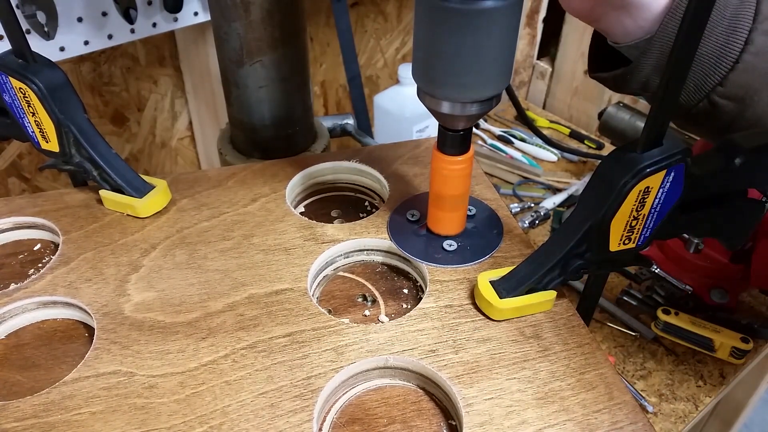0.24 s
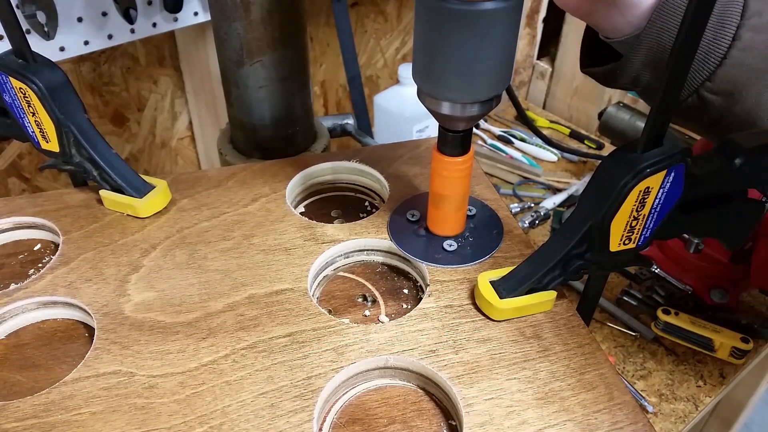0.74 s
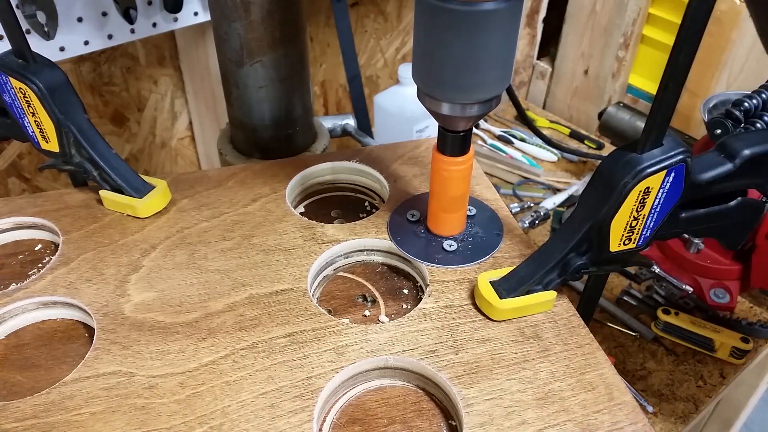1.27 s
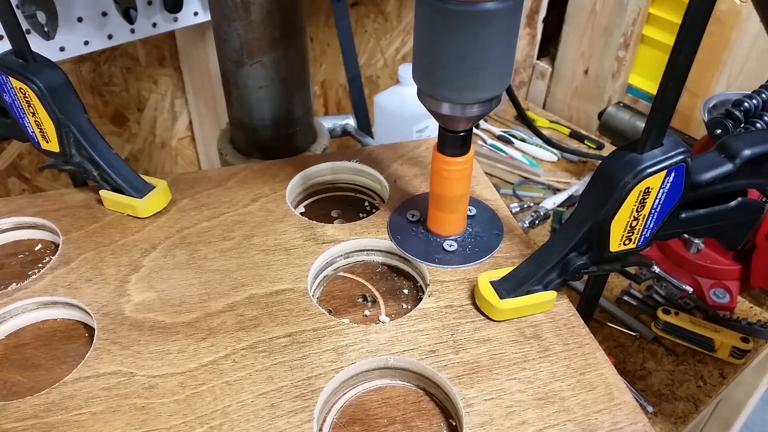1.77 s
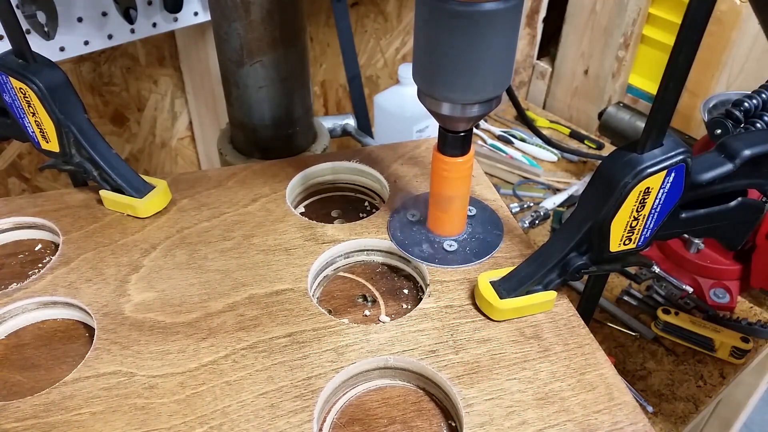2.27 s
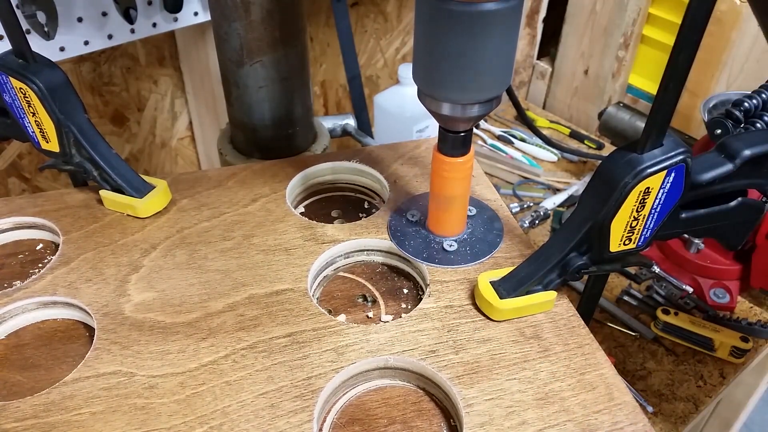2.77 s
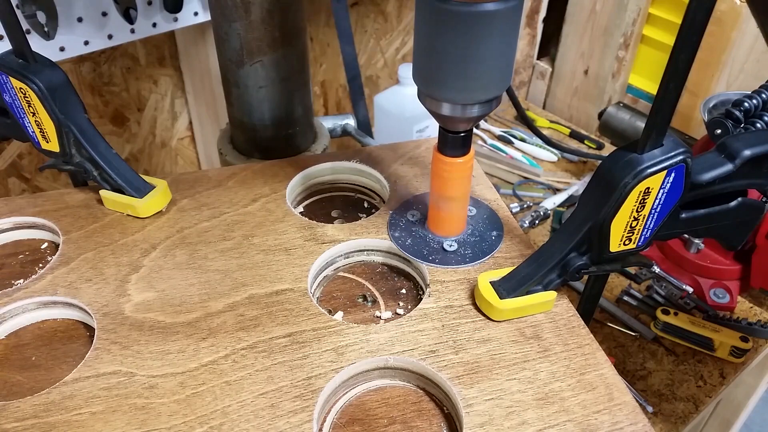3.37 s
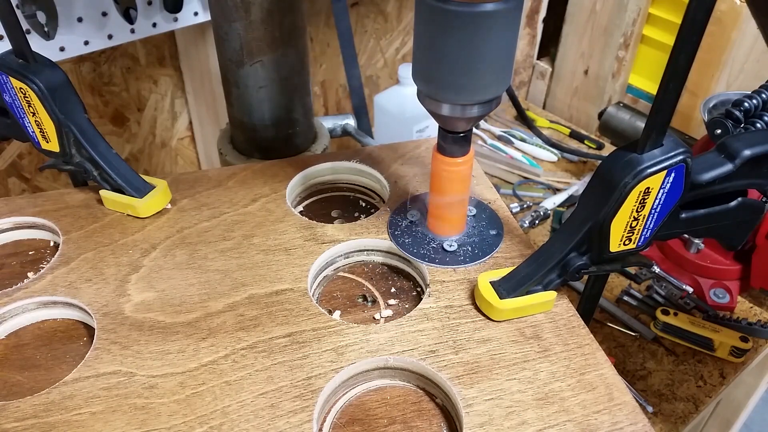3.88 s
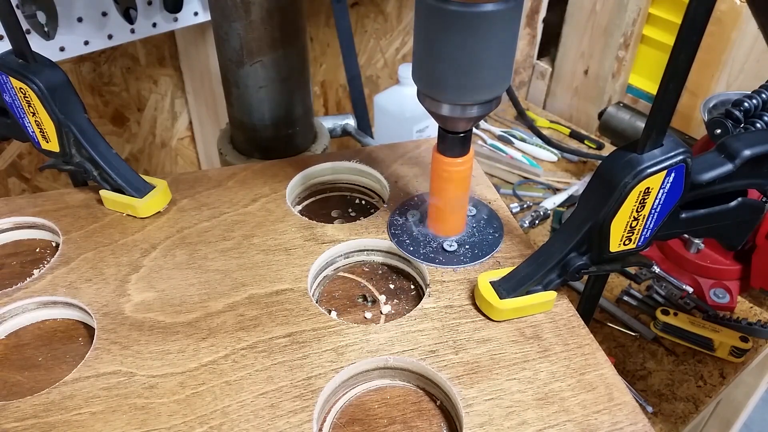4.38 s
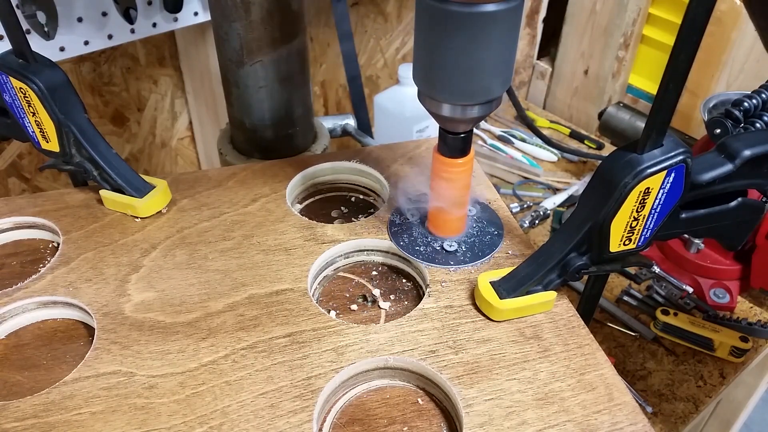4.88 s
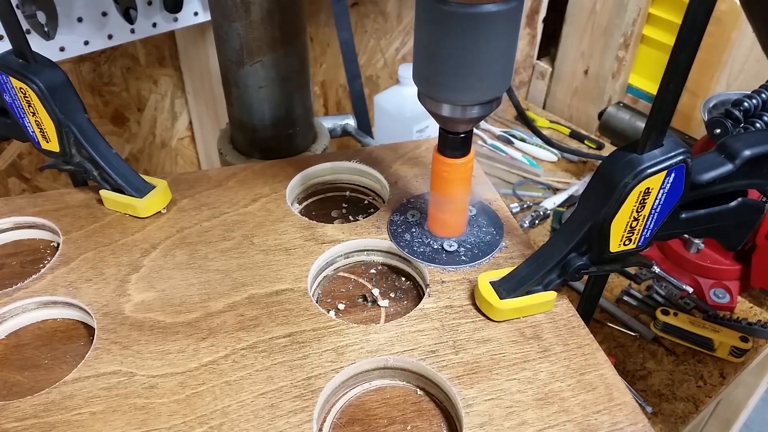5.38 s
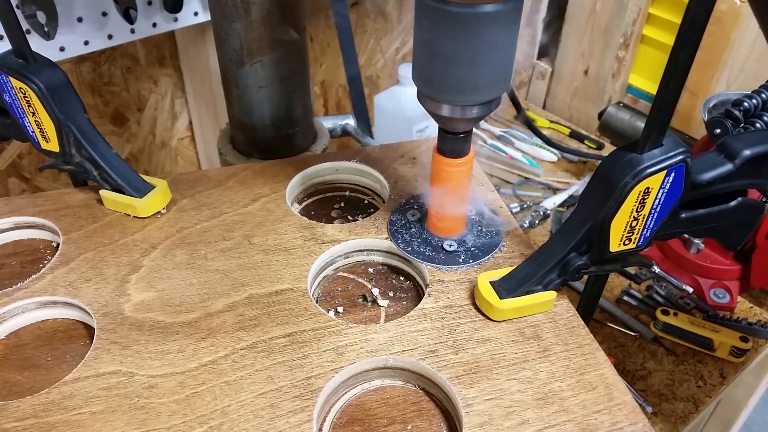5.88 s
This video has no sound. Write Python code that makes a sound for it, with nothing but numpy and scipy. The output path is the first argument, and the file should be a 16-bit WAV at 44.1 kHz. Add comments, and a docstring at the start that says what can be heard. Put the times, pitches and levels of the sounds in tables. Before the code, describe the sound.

A drill press hums with a light rubbing, ticks sharply, then a hole saw grinds and screeches steadily through thin metal, faltering briefly near the end.

```python
"""A hole saw in a drill press grinds through a thin metal plate clamped on a wooden board, in a small workshop.
First the motor hums, its frame rumbles and something rubs, until a rising whine ends in a sharp tick.
Then the saw bites: its teeth rasp once a turn and drive the resonances of plate and saw cup, and chips fizz.
Mostly while the cut is shallow, the rim sticks and slips in short chirps; low knocks push through the table.
Near the end the scrape dips briefly and the teeth bite again; a short diffuse tail follows the saw."""
import sys
import numpy as np
from scipy import signal
from scipy.fft import rfft, irfft
from scipy.io import wavfile
from scipy.ndimage import uniform_filter1d

SR = 44100
rng = np.random.default_rng(int(sys.argv[2]) if len(sys.argv) > 2 else 0)


def waveform_to_disk(signal):
    """Save audio, clipped to [-1, 1], as 16-bit WAV at the path in sys.argv[1]."""
    frames = np.transpose(np.atleast_2d(signal))
    scaled = np.clip(frames, -1, 1) * 32767
    samples = np.round(scaled).astype(np.int16)
    wavfile.write(sys.argv[1], SR, samples)


N = 270333
TIME = np.arange(N) / SR  # s
BINS = np.fft.rfftfreq(N, 1 / SR)  # Hz
CENTRED = np.array([[1], [0]])  # a sound that both ports share: all common part, no differing part
TICK_S, FALTER_START_S, FALTER_END_S = 0.6672, 5.951, 5.985

# How unevenly the rim touches in a turn. Each row: time in seconds, swing of the rasp in dB,
# throb of the plate in dB, throb of the saw cup in dB, three-lobed rattle in dB.
WOBBLE = [(0.8, 0, 0, 1.5, 0), (0.97, 4, -1, 3, -1.5), (1.2, 3.7, 0.5, 4.2, -1.5), (1.4, 3.3, 0, 2, -1),
          (1.6, 4, 2, 6, -1), (1.85, 3, 3.5, 4.5, 0), (2.13, 2.5, 0.5, 3, 0), (2.3, 3, 3.8, 3, 0),
          (2.58, 2, 3.3, 3, 0), (2.78, 2, 1.5, 3, 0.5), (3.0, 1.5, 5, 4.5, 0), (3.13, 0.5, -0.5, 1.5, 2),
          (3.35, 0.5, 1.5, 2, 2), (3.6, 0.5, 1.5, 4, 1), (3.72, 0.5, 0.5, 2, 1), (3.85, 0.5, 4, 2.5, -1),
          (4.1, 0.5, 1.3, 3, 0), (4.35, 1, 0.3, 1.5, 0.5), (4.9, 0.5, 1.3, 1.3, 0), (5.15, 1, 1, 1.5, 2),
          (5.7, 1.5, 3.5, 2, 0), (6.05, 1.5, 1.5, 5.5, -0.5)]
# Spectrum of the rub, also heard in the tick. Each row: frequency in Hz, density in dB per Hz.
RUB_SPECTRUM = [(2000, -12), (4500, -8.5), (5800, -3.5), (6600, -4), (8000, 3), (8900, -7.5), (11100, 0.5),
                (13200, -10), (15000, -5), (16000, -6.5)]


def gain_of(db):
    """Decibel law: 20 dB is a factor of ten in amplitude."""
    return 10 ** (np.asarray(db) / 20)


def evened(x):
    """Normalization: scales to unit rms."""
    return x / np.sqrt(np.mean(x ** 2) + 1e-20)


def read_spectrum(points, hz):
    """Spectral interpolation: joins the points on a log-frequency axis."""
    f, value = np.transpose(points)
    return np.interp(np.log(hz + 1), np.log(f + 1), value)


def curves(rows):
    """Linear interpolation: every column of a table over time."""
    s, *columns = np.transpose(rows)
    return [np.interp(TIME, s, c) for c in columns]


def drift(hz):
    """Band-limited chance: noise under a Gaussian low-pass up to about hz, rms 1."""
    return evened(irfft(rfft(rng.standard_normal(N)) * np.exp(-(BINS / hz) ** 2), N))


def shaped(x, gain):
    """Linear filtering: one gain for each frequency, rms 1."""
    return evened(irfft(rfft(x) * gain, N))


def spectrum_gain(points):
    """Spectral envelope: the gain at every bin from a table in dB."""
    return gain_of(read_spectrum(points, BINS))


def ringing(modes):
    """Modal superposition: the powers of resonances with steep skirts add up."""
    power = 0
    for hz, width, db in modes:
        power = power + gain_of(2 * db) / (1 + ((BINS - hz) / width) ** 2 * 2) ** 2
    return np.sqrt(power)


def resonate(x, hz, width):
    """Damped resonance: a critically damped envelope on a carrier that follows the curve hz."""
    turn = np.exp(2j * np.pi * np.cumsum(hz) / SR)
    r = np.exp(-np.pi * width / SR)
    envelope = signal.lfilter([(1 - r) ** 2], [1, -2 * r, r * r], x / turn)
    return evened((turn * envelope).real)


def once_a_turn(turns, place, swing_db):
    """Amplitude modulation: contact pressure peaks at one place in the turn."""
    return evened(gain_of(swing_db * np.cos(2 * np.pi * (turns - place))))


def scraping(turns, place, swing_db, snatch=0.22):
    """Asymmetric modulation: contact once a turn grabs quickly and lets go slowly."""
    skew = once_a_turn(2 * (turns - place), -1 / 4, snatch * swing_db)
    return evened(once_a_turn(turns, place, swing_db) * skew)


def grit(per_s, spread_db, share):
    """Shot noise: tiny fractures of uneven size over smooth friction noise, as a shared and a differing part."""
    size = gain_of(spread_db * np.minimum(rng.exponential(1, N), 4))
    size *= rng.random(N) < per_s / SR
    share = np.clip(share, 0, 1)
    fractures = evened(size * rng.choice([-1, 1], (2, N)))
    return np.sqrt(share) * fractures + np.sqrt(1 - share) * rng.standard_normal((2, N))


def strikes(turns, places):
    """Periodic impulses: clicks at fixed places (turns, dB) round the rim, a little unequal from turn to turn."""
    clicks = 0
    for place, db in places:
        clicks = clicks + gain_of(db) * np.diff(np.floor(turns - place), prepend=np.floor(-place))
    return evened(clicks * (1 + 0.38 * drift(11.0))) * CENTRED


def bump(s, half_s):
    """Gaussian envelope: a smooth swell of height 1 around the time s."""
    return np.exp(-((TIME - s) / half_s) ** 2)


def after(s, settle_s):
    """Relaxation: jumps to 1 at the time s, then settles back to 0."""
    return (TIME > s) * bump(s, settle_s)


def eased(condition, samples):
    """Smoothed switching: 1 where the condition holds, with short ramps."""
    return uniform_filter1d(1. * condition, size=samples)


def partials(hz, levels_db):
    """Harmonic series: a tone that follows the curve hz, with its overtones, as complex signals."""
    phase = 2 * np.pi * np.cumsum(hz) / SR
    return sum(gain_of(db) * np.exp(1j * (k + 1) * phase) for k, db in enumerate(levels_db))


def mains_hum():
    """Harmonic hum: even multiples of the mains frequency waver in level and phase."""
    mains_hz = 60
    # Multiples of the mains frequency.
    orders = [2, 4, 6, 8]
    # Rms level of each multiple in dB.
    levels_db = [-32.5, -48.5, -40.5, -46.5]
    hum = 0
    for k, db in zip(orders, levels_db):
        level = np.sqrt(2) * gain_of(db + 0.11 * k * drift(25))
        phase = 2 * np.pi * (k * mains_hz * TIME + rng.random()) + 0.03 * k * drift(27)
        hum = hum + level * np.cos(phase)
    return CENTRED * hum * gain_of(0.4 * drift(22))


def motor_frame():
    """Forced vibration: grit drives a broad rumble and the modes of the motor frame."""
    rumble_db, frame_db = -37.5, -38.5
    # Each row: frequency in Hz, density in dB per Hz.
    rumble_spectrum = [(15, -13), (45, 9), (80, -1), (130, -1.5), (220, -2), (400, -1), (560, -2.5),
                       (750, -13), (1000, -7), (1500, -9), (2200, -13), (3000, -13.5), (16000, -27)]
    # Each row: mode in Hz, width in Hz, level in dB.
    frame_modes = [(49.4, 8.8, -1), (122, 11, 3), (161, 8.3, -2), (211, 4.7, -4.5), (273, 8.1, -4),
                   (326, 7.2, -23), (556, 19, -5), (1885, 22, -13.5), (2094, 71, -13)]
    unsteady = evened(gain_of(1.75 * drift(34)))
    rumble = shaped(grit(500, 1.9, 0.18) * unsteady, spectrum_gain(rumble_spectrum))
    frame = shaped(grit(450, 3.9, 0.25), ringing(frame_modes))
    return gain_of(rumble_db) * rumble + gain_of(frame_db) * frame


def rub():
    """Dry friction: a light touch comes round a little unevenly and lightens until the tick."""
    rub_db, rub_hz, first_s = -35.5, 21.23, 0.016
    fade_db_per_s, uneven_db = 6.5, 2.1
    # Each row: mode in Hz, width in Hz, level in dB.
    rub_modes = [(5840, 200, 1.5), (6500, 120, -12), (8060, 370, -1.5), (9000, 150, -1), (9900, 220, -5),
                 (10600, 200, -1), (11350, 260, -2), (12000, 220, -4), (12600, 250, -6), (14000, 250, -6),
                 (15000, 250, -5)]
    passes = (TIME - first_s) * rub_hz + 0.054 * drift(35)
    touch_db = uneven_db * drift(31) - fade_db_per_s * np.minimum(TIME, TICK_S)
    touch = scraping(passes, 0, 5.0, snatch=0.13) * gain_of(touch_db)
    flicker = evened(gain_of(1.3 * drift(150)))
    colour = spectrum_gain(RUB_SPECTRUM) + ringing(rub_modes)
    return gain_of(rub_db) * shaped(grit(1500, 2.7, 0.18) * touch * flicker, colour)


def press_table():
    """Forced vibration: the table rumbles throughout and shakes more for a while after each bite."""
    shake_db, bite_db, settle_s = -52, 9.5, 0.67
    # Each row: frequency in Hz, density in dB per Hz.
    table_spectrum = [(20, -11), (100, -16.5), (165, 1.5), (230, -2), (300, -8), (400, 4.5), (900, 6.5),
                      (2000, -14.5)]
    bites = after(TICK_S, settle_s) + after(FALTER_END_S, settle_s)
    return gain_of(shake_db + bite_db * bites) * shaped(grit(300, 0.94, 0.24), spectrum_gain(table_spectrum))


def tick():
    """Stick and release: the rub tightens into a rising whine, then a bright metallic snap swells and stops."""
    snap_db, whine_db, whine_snap_db = -18, -41, -28.5
    whine_hz, whine_rise_hz = 2040, 400
    colour = spectrum_gain(RUB_SPECTRUM) + ringing([(8100, 600, 15), (4700, 200, 3)])
    ring = shaped(rng.standard_normal((2, N)), colour)
    swell = bump(TICK_S, .0012) + .14 * bump(TICK_S - .013, .013)
    snap = gain_of(snap_db) * ring * swell
    whine = resonate(rng.standard_normal(N), whine_hz + whine_rise_hz * bump(TICK_S, .007), 220)
    whine *= gain_of(whine_db) * bump(TICK_S - .018, .018) + gain_of(whine_snap_db) * bump(TICK_S, .002)
    return (snap + CENTRED * whine) * (TIME < TICK_S + .0007)


def growl(turns, drive_db):
    """Resonant build-up: one blow a turn excites the main mode, which rises as the plate is driven harder."""
    mode_hz, stiffen_hz_per_db, waver_hz, width_hz = 668, 1.0, 5, 108
    slip_turns, grit_share = 0.005, 0.25  # each blow lands a little early or late, and grit joins it
    blows = strikes(turns + slip_turns * drift(20), [(-.3, 0)]) + grit_share * grit(920, 0.65, 0.23)
    hz = mode_hz + stiffen_hz_per_db * drive_db + waver_hz * drift(13.2)
    swells = resonate(resonate(blows, hz, width_hz), hz, width_hz)  # each blow builds up before it dies
    return shaped(swells, ringing([(650, 190, 0)]))


def plate(turns, drive_db):
    """Forced modes: the rim's high side drives the plate once a turn; deep in the cut its main mode growls."""
    deep_from_s, deep_to_s, edge_s = 3.75, 5.42, 0.036
    growl_light_db, growl_deep_db = -6, 12
    grip_yields_db = -9  # the gripped band gives way to the growl
    high_side = 0.1  # place in the turn where the plate throbs hardest
    rattles_per_turn = 2.96  # a three-lobed chatter that creeps round the rim
    # Each row: mode in Hz, width in Hz, level in dB.
    plate_modes = [(477, 14.4, 2.5), (527.5, 25.6, -0.5), (627, 26, -1), (624.7, 9.7, 1), (658.4, 25, 3),
                   (704, 15, -3), (762, 30, -0.5), (812.5, 30.3, 3)]
    # The band driven hardest, low modes under a light touch.
    # Each row: time in seconds, centre in Hz, level in dB against the broad push.
    grip_rows = [(0.75, 487, 11), (1.1, 470, 1.5), (1.4, 662, -0.5), (2.0, 720, -26), (2.3, 742, 2),
                 (2.6, 734, 11), (3.0, 723, 10), (3.12, 764, 10), (3.27, 713, 5), (3.5, 770, 10),
                 (3.7, 735, 11), (4.2, 689, 7.5), (5.35, 679, 17.5), (5.5, 732, -2), (5.68, 780, -3),
                 (5.75, 573, 4)]
    deep = (np.tanh((TIME - deep_from_s) / edge_s) - np.tanh((TIME - deep_to_s) / edge_s)) / 2
    growl_db = growl_light_db + (growl_deep_db - growl_light_db) * deep
    grip_hz, grip_db = curves(grip_rows)
    _, throb_db, _, rattle_db = curves(WOBBLE)

    push = grit(900, 0.38, 0.83) * once_a_turn(turns, 0.032, 0.28)
    push = push + 0.65 * strikes(turns, [(-.04, 0.5), (.11, -6), (.46, -0.5)])
    advance = np.exp(2j * np.pi * BINS * 0.0011)  # 1.1 ms earlier
    gripped = shaped(resonate(push, grip_hz, 170), ringing(plate_modes) * advance)
    ring = shaped(push, ringing(plate_modes))
    ring = ring + gain_of(grip_db + grip_yields_db * deep) * gripped
    ring = ring + gain_of(growl_db) * growl(turns, drive_db)
    ring *= once_a_turn(turns, high_side, throb_db)
    ring *= once_a_turn(rattles_per_turn * turns, 0, rattle_db)
    # a steady feed gives each turn nearly the same energy
    power = uniform_filter1d(uniform_filter1d(ring[0] ** 2, size=1060), size=1060)
    return ring / np.sqrt(power + 1e-9) * gain_of(0.43 * drift(19))


def saw_cup(turns, chatter, buried):
    """Forced modes: grit and two strikes a turn ring the saw cup, hardest at a place that shifts with depth."""
    place_shallow, place_buried = 0.04, -0.17  # turns
    # Each row: mode in Hz, width in Hz, level in dB.
    cup_modes = [(1158, 76, 4), (1247, 78, 4.5), (1350, 28, 4), (1419, 37, 8), (1459, 60, 4.5),
                 (1643, 37, -0.5)]
    throb_db = curves(WOBBLE)[2]
    push = grit(900, 0.59, 0.41) * chatter + 0.093 * strikes(turns, [(-.05, -3), (.15, 1)])
    cup = shaped(push, ringing(cup_modes))
    cup *= once_a_turn(turns, place_shallow + (place_buried - place_shallow) * buried, throb_db)
    return cup / np.sqrt(uniform_filter1d((cup ** 2).mean(0), size=2120) + 1e-9)


def rasp(turns, chatter):
    """Modulated fracture noise: the teeth tear once a turn, and snag while one side of the rim touches."""
    # Each row: frequency in Hz, density in dB per Hz.
    rasp_spectrum = [(900, -30.5), (1200, -2), (1850, 3), (2250, 4.5), (2700, 2.5), (3500, 2), (4200, 2),
                     (5000, 3), (5800, 6.5), (6650, 0), (7500, 2), (9200, -3), (10800, -5), (11700, -5.5),
                     (13000, -5), (16000, -8.5)]
    # Each row: mode in Hz, width in Hz, level in dB.
    rasp_modes = [(1830, 40, 0), (2300, 55, -10.5), (2550, 70, -10.5), (2930, 73, 3.5), (3440, 110, 2),
                  (3700, 150, 0)]
    swing_db = curves(WOBBLE)[0]
    snags = evened(gain_of(0.45 * swing_db * drift(200)))
    tearing = grit(1800, 0.81, 0.26) * scraping(turns, -0.091, swing_db) * chatter * snags
    return shaped(tearing, spectrum_gain(rasp_spectrum) + ringing(rasp_modes))


def chip_fizz(turns, chatter, buried):
    """Shot noise: breaking chips fizz, first on the surface and then down in the groove."""
    # On the surface. Each row: frequency in Hz, density in dB per Hz.
    surface_spectrum = [(4000, -25), (7000, -2), (9000, 3), (10400, 4), (11000, 0), (11700, -8),
                        (12400, -4), (13300, 0), (14600, -4), (15500, -1.5), (16500, -4)]
    # Down in the groove. Each row: frequency in Hz, density in dB per Hz.
    buried_spectrum = [(4000, -30), (7000, 3), (9000, 3.5), (10400, 2), (11700, -1), (13300, 0.5),
                       (14600, -6), (15500, -1.5), (16500, -2)]
    swing_db = curves(WOBBLE)[0]
    chips = grit(2500, 7.3, 0.4) * once_a_turn(turns, 0.33, .5 * swing_db) * chatter
    surface = shaped(chips, spectrum_gain(surface_spectrum))
    return (1 - buried) * surface + buried * shaped(chips, spectrum_gain(buried_spectrum))


def groove_walls(chatter, buried):
    """Friction excitation: the walls of the groove rub once the teeth are buried."""
    # Each row: mode in Hz, width in Hz, level in dB.
    wall_modes = [(1090, 140, -2), (1520, 58, -3), (1875, 120, 0), (2196, 720, -3.5)]
    return buried * shaped(grit(1600, 1.6, 0.24) * chatter, ringing(wall_modes))


def cutting(turns):
    """Common drive: plate, saw cup, rasp, fizz and groove walls all follow the feed into the metal."""
    firm_db, fizz_follows = -36.5, 0.48  # a firm feed; fizz gains this many dB per dB of feed
    rasp_over_feed_db, groove_over_feed_db = 4.5, -3
    groove_from_s, groove_grow_s = 2.58, 0.51
    cup_follows = 0.44  # share of a catch, in dB, that reaches the saw cup
    rebite_feed_db, rebite_fizz_db = -41, 7  # after the falter: the feed, and extra fizz of fresh metal
    falter_db, jolt_db, settle_s = -8, 3.5, 0.072  # the scrape dips, then overshoots as the teeth land
    # How hard the saw is fed, until the falter ends. Each row: time in seconds, feed level in dB.
    feed_rows = [(0.68, -48), (1.03, -36.5), (1.31, -37), (1.33, -41.5), (1.53, -35.5), (1.65, -38.5),
                 (1.75, -41.5), (2.03, -49), (2.22, -45.5), (2.43, -40), (3.01, -40), (3.23, -37.5),
                 (4.1, -38), (4.2, -40.5), (4.51, -38), (5.32, -42), (5.73, -41), (5.95, -49.5)]
    # As the groove deepens the plate rings more freely and the fizz dulls. Each row: time in seconds,
    # plate ring over the feed in dB, saw cup ring over the feed in dB, fizz at a firm feed in dB.
    depth_rows = [(0.68, 4, -9, -38), (0.82, 3.5, 1, -37.5), (0.95, 2.5, 4.5, -40), (1.15, -2.5, 5.5, -45),
                  (1.33, 2, 0.5, -46), (1.46, -2, 1, -38), (1.6, 0.5, -1.5, -38.5), (1.78, 2.5, -2, -34),
                  (2.0, 2, 0, -35.5), (2.25, 6, -2, -33), (2.6, 8, 0.5, -37), (3.3, 7, -1, -36),
                  (3.6, 8.5, 4, -38.5), (4.0, 11.5, 0.5, -40.5), (4.65, 10, 2, -40.5),
                  (5.6, 9.5, 5.5, -40.5), (5.8, 6, -1.5, -40.5)]
    # The teeth catch on the plate (+) or slip over it (-).
    # Each row: centre in seconds, half length in seconds, change of the plate ring in dB.
    catches = [(0.754, 0.02, 8.5), (0.839, 0.043, 7.5), (1.017, 0.033, 5.5), (1.464, 0.043, 6),
               (1.81, 0.039, 6), (2.373, 0.069, 2.5), (2.513, 0.039, -5.5), (2.92, 0.018, -4),
               (3.358, 0.019, 5), (3.416, 0.025, -1.5), (3.603, 0.02, 4.5), (3.67, 0.018, -2),
               (4.218, 0.041, -7.5), (4.61, 0.061, 2.5), (4.668, 0.011, -3), (5.054, 0.051, -4),
               (5.157, 0.038, -6.5), (5.32, 0.073, 3.5)]
    rebite = eased(TIME > FALTER_END_S, 150)
    falter = eased((TIME > FALTER_START_S) & (TIME < FALTER_END_S), 150)
    feed_db = (1 - rebite) * curves(feed_rows)[0] + rebite * rebite_feed_db
    free_db, cup_db, fizz_db = curves(depth_rows)
    catch_db = sum(db * bump(s, half_s) for s, half_s, db in catches)
    drive_db = free_db + catch_db
    buried = (1 + np.tanh((TIME - groove_from_s) / groove_grow_s)) / 2
    chatter = evened(gain_of(1.05 * drift(140)))  # teeth catch and let go

    cup_level_db = feed_db + cup_db + cup_follows * catch_db + 1.32 * drift(8.8)
    fizz_level_db = fizz_db + fizz_follows * (feed_db - firm_db) + rebite_fizz_db * rebite
    scrape = gain_of(cup_level_db) * saw_cup(turns, chatter, buried)
    scrape += gain_of(feed_db + rasp_over_feed_db) * rasp(turns, chatter)
    scrape += gain_of(fizz_level_db) * chip_fizz(turns, chatter, buried)
    scrape += gain_of(feed_db + groove_over_feed_db) * groove_walls(chatter, buried)
    scrape *= gain_of(falter_db * falter + jolt_db * after(FALTER_END_S, settle_s))
    return gain_of(feed_db + drive_db) * plate(turns, drive_db) + scrape


def knocks():
    """Impulse response: short low pushes through the table, each a damped pulse with one swing back."""
    # Each row: start in seconds, level in dB before the common lift below.
    knock_rows = [(1.069, -48), (1.272, -46), (6.037, -48)]
    out = np.zeros(N)
    for s, db in knock_rows:
        u = np.maximum(TIME - s, 0) / 0.00067
        out += gain_of(db + 15.0) * u * (2 - u) * np.exp(-u)
    return out


def squeal(turns):
    """Stick-slip: the rim skids and chirps once a turn, at a spot that creeps until another tooth takes over."""
    third_db = -7  # third partial against the octave
    skid_hz, skid_longer = 5090, 2.6  # the rough skid outlasts its chirp by this factor
    chirp_dip = 0.09  # share by which the pitch of a skidding chirp dips at its middle, rising towards its edges
    scatter, slip_turns = 0.015, 0.012  # skidding chirps differ in pitch (share); all differ in place
    # Runs of chirps. Each row: start in seconds, end in seconds, pitch in Hz, level in dB before a common
    # lift, first and last place in turns, half length in turns, octave in dB, share of skid from 0 to 1.
    runs = [(1.19, 1.282, 5050, -34.5, 0.62, 0.64, 0.06, 5.5, 0.4),
            (1.288, 1.381, 4840, -28.5, 0.62, 0.79, 0.06, -6.5, 0.066),
            (1.556, 1.685, 2962, -32, 1, 0.9, 0.12, -16, 0.04),
            (1.554, 1.697, 4420, -36.5, 0.45, 0.63, 0.1, 6.5, 0.45),
            (1.687, 1.765, 4530, -37, 0.52, 0.47, 0.092, 4, 0.68),
            (1.766, 1.91, 4590, -36, 0.47, 0.67, 0.134, 4.5, 0.28),
            (1.908, 1.95, 4540, -38.5, 0.52, 0.45, 0.17, 6, 0.4),
            (1.968, 2.122, 4470, -38.5, 0.45, 0.68, 0.11, 4.5, 0.47),
            (2.121, 2.182, 4700, -35.5, 0.45, 0.52, 0.092, 6.5, 0.5),
            (2.185, 2.243, 4500, -37.5, 0.56, 0.57, 0.21, 5.5, 0.44),
            (2.233, 2.454, 4570, -36.5, 0.41, 0.53, 0.12, 5, 0.53),
            (2.522, 2.664, 5000, -40, 0.36, 0.31, 0.09, 2, 0.55),
            (2.657, 2.99, 5060, -34.5, 0.28, 0.39, 0.069, 6, 0.47),
            (3.144, 3.31, 5070, -37, 0.08, 0.62, 0.14, 1, 0.65),
            (5.991, 6.098, 4920, -46, 0.57, 0.64, 0.41, 8, 0.92)]
    out = np.zeros((2, N))
    rough, fine = .065 * drift(1800), .055 * drift(1100)
    sides = np.array([drift(920), drift(320)])  # phase wander of the shared and the differing part
    detune = scatter * drift(29.8)
    spot = turns + slip_turns * drift(28)
    for start, end, hz, db, first, last, length, octave_db, skid in runs:
        at = (TIME > start) & (TIME < end)
        creep = np.linspace(first, last, at.sum())
        off = ((spot[at] - creep + .5) % 1 - .5) / length
        press = np.exp(-off ** 2)
        skid = np.clip(skid, 0, 1)
        chirp_hz = hz * (1 + skid * (detune[at] + fine[at] + chirp_dip * (1 - press)))
        chirp = press * partials(chirp_hz, [0, octave_db, octave_db + third_db])
        rough_skid = partials(skid_hz * (1 + rough[at]), [0, octave_db - 9.5])
        scrape = np.exp(-(off / skid_longer) ** 2) * rough_skid
        mixed = np.sqrt(1 - skid) * chirp + np.sqrt(skid) * scrape
        tone = (mixed * np.exp(.6j * sides[:, at])).real
        out[:, at] += gain_of(db + 4.5) * signal.windows.tukey(at.sum(), .08) * tone
    return out


def ports(pair):
    """Spatial coherence: two microphone ports, alike in the bass, less alike and louder on the left in the treble."""
    # Each row: frequency in Hz, left-right likeness from 0 to 1.
    likeness = [(100, 1), (700, 1), (1400, 0.92), (2400, 0.58), (4000, 0.66), (7000, 0.72), (10000, 0.45),
                (15000, 0.85)]
    # Each row: frequency in Hz, left minus right in dB.
    lean_rows = [(60, 2.7), (150, 2.6), (700, 2), (1300, 1.6), (2400, 2.7), (4400, 6), (8000, 5.5),
                 (15000, 5)]
    # Each row: frequency in Hz, phase by which the left leads in radians.
    lead_rows = [(100, 0.21), (1400, 0.3), (2800, 0.58), (3800, 1.12), (6000, 1.36), (8400, 1.35),
                 (9500, 0), (16000, 0.89)]
    shared, differing = rfft(pair)
    same = np.clip(read_spectrum(likeness, BINS), 0, 1)
    common = shared * np.sqrt((1 + same) / 2)
    apart = differing * np.sqrt((1 - same) / 2)
    half_lean = gain_of(read_spectrum(lean_rows, BINS) / 2)
    lean = half_lean * np.exp(.5j * read_spectrum(lead_rows, BINS))
    return irfft(np.array([(common + apart) * lean, (common - apart) / lean]), N)


def workshop(x, t60=0.071, wet_db=-13):
    """Diffuse reverberation: sparse, decaying random echoes from the bench and the walls."""
    t = np.arange(SR // 3) / SR
    taps = rng.standard_normal((2, len(t))) * (rng.random((2, len(t))) < .06)
    taps *= (t > .004) * gain_of(-60 * t / t60)
    tail = signal.fftconvolve(x, taps / np.linalg.norm(taps[0]), axes=1)[:, :N]
    return x + gain_of(wet_db) * tail


def scene():
    """Superposition: the motor gives way to the cut at the tick, and the table rumbles underneath."""
    # Each row: time in seconds, spindle speed in turns per second.
    spindle = [(0.0, 41.13), (0.7, 42.01), (1.2, 42.39), (1.9, 42.48), (2.3, 41.6), (2.7, 41.94),
               (3.2, 41.16), (3.7, 41.83), (4.3, 41.68), (4.8, 40.99), (5.4, 41.12), (6.13, 41.08)]
    turns = np.cumsum(curves(spindle)[0]) / SR
    biting = eased(TIME > TICK_S, 80)
    motor = mains_hum() + motor_frame() + rub()
    near = ports((1 - biting) * motor + press_table() + tick())
    saw = workshop(ports(biting * cutting(turns) + squeal(turns)))
    return near + saw + knocks()


def record(dry):
    """Band limiting: a linear-phase low-pass removes the highest treble."""
    edge_hz = 15900
    lowpass = signal.firwin(511, edge_hz, window=("kaiser", 9), fs=SR)
    return signal.oaconvolve(dry, lowpass[None], "same")


dry = scene()
out = record(dry)
waveform_to_disk(out)
```